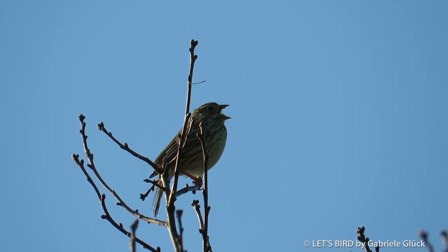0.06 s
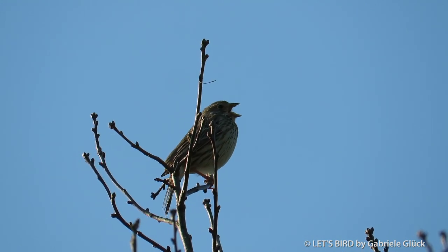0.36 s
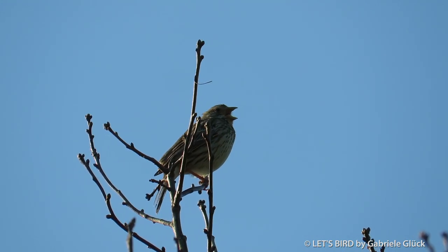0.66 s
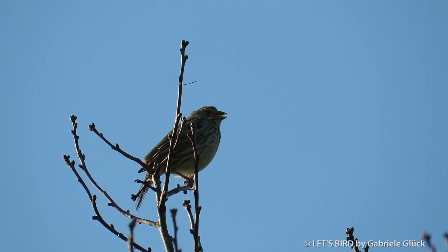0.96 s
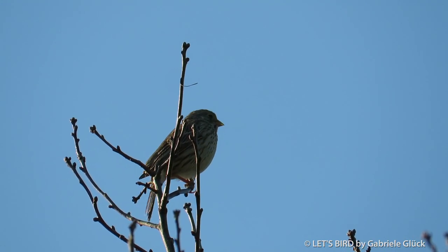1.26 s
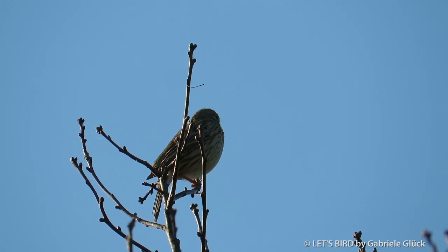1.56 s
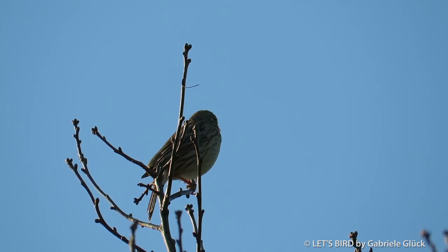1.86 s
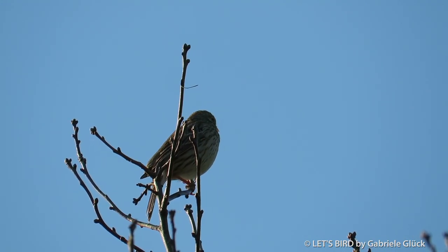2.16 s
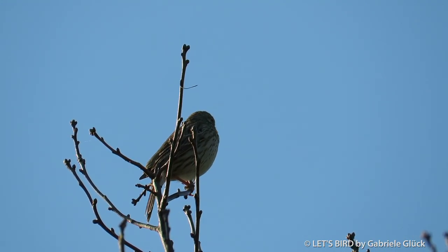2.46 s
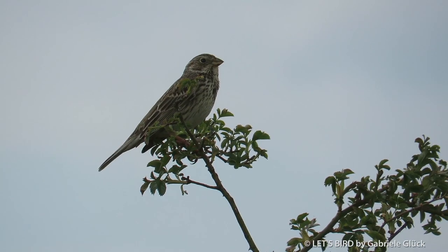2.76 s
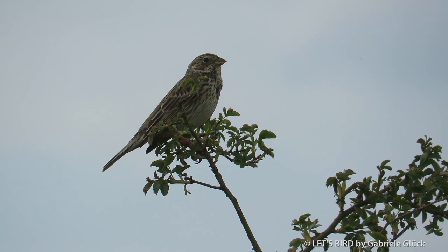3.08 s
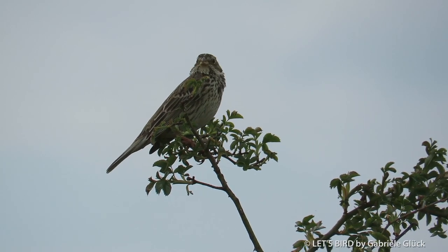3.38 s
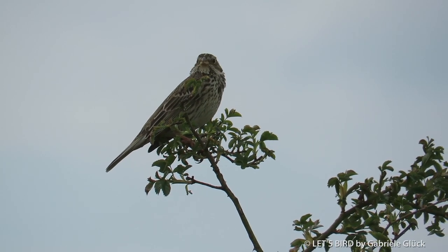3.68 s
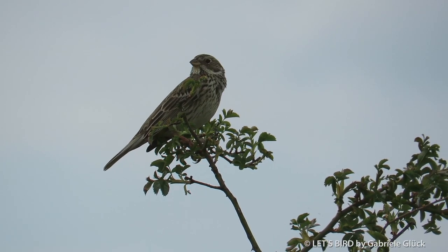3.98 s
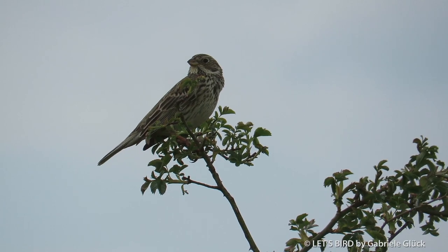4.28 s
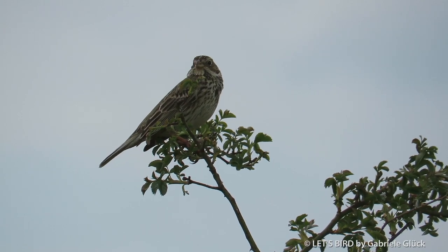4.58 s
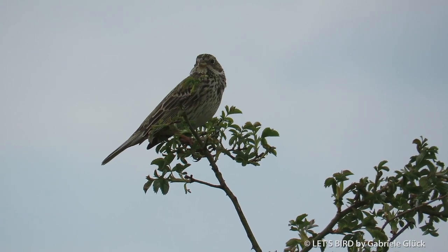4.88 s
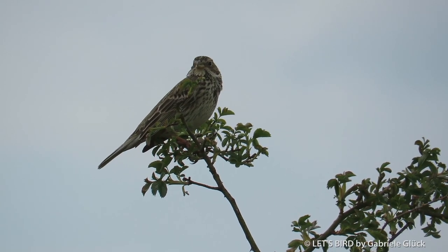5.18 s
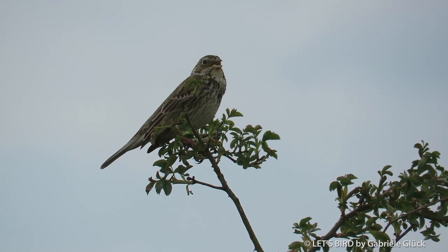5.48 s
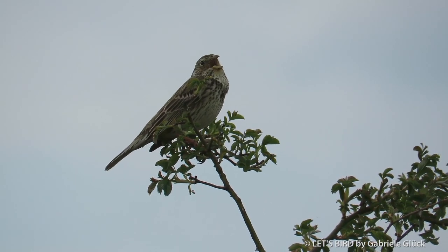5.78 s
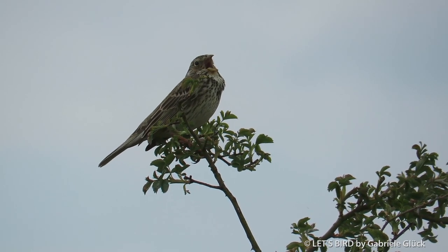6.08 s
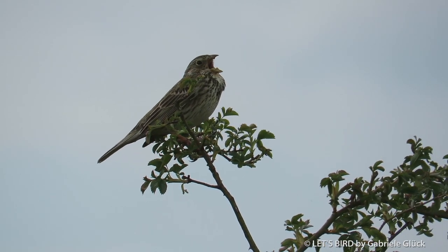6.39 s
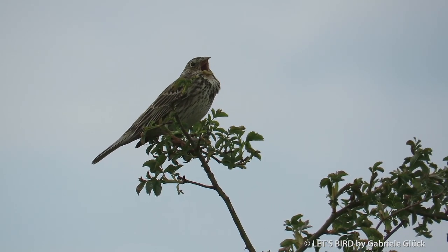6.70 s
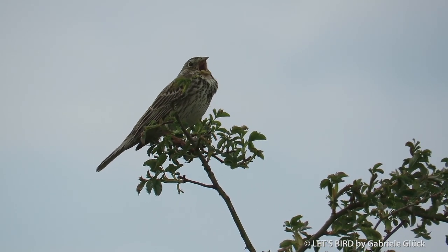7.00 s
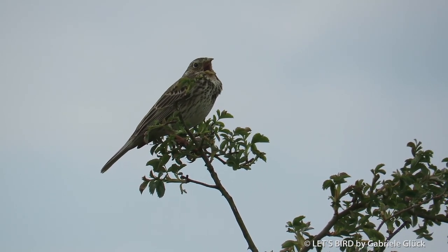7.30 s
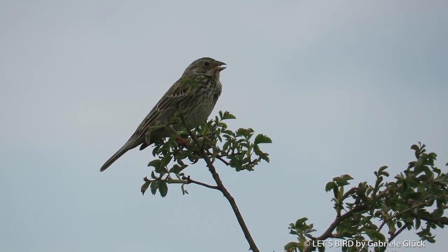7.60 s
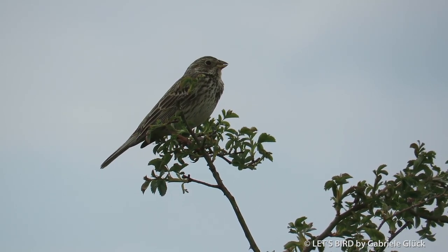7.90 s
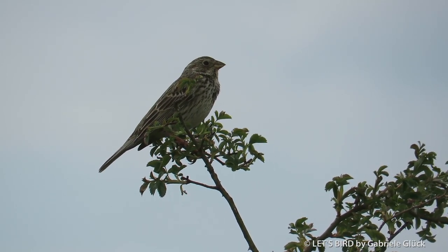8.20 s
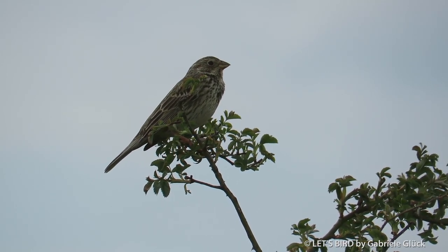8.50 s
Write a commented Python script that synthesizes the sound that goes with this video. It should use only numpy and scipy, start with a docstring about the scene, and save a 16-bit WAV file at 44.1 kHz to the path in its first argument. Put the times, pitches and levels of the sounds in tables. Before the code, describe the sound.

From the start, a small bird close by sings a fast, high jangle of chirps and buzzes, ending with four quick chinks at about 1 to 1.2 seconds. Behind it are a soft outdoor hush, faint electronic crackle and a mellow distant warble. At 2.5 seconds the background changes abruptly: the crackle and warble stop, the hush softens, and a thin, very high electronic whine begins and stays. Light puffs of wind rumble on the microphone now and then, while faraway birds whistle and trill faintly. At about 5.4 seconds the close bird starts six sharp ticks that quicken and grow louder. From 6.2 seconds they tumble into a bright, buzzy jumble, closing with a short rattle from 7.2 to 7.6 seconds. Distant birds, whine and soft wind continue until about 8.6 seconds.

```python
"""A jangle of glides, buzzes and high chinks, over faint crackle, ends one corn bunting song. After a cut
to another bush it sings a whole one: ticks, a jumble, a rattle. The two sides of its syrinx are separate
oscillators, rapidly modulated in frequency; foliage scatters their sound. Other birds sing far off in
the hush of open country. A camera's electronics crackle at the first bush; at the second they whine
very high, and wind rumbles in puffs."""
import sys
import numpy as np
from scipy import signal
from scipy.fft import rfft, irfft, next_fast_len
from scipy.io import wavfile
from scipy.ndimage import uniform_filter1d

SR = 44100
rng = np.random.default_rng(int(sys.argv[2]) if len(sys.argv) > 2 else 0)


def generate_wav(signal):
    """Clip the signal to [-1, 1] and save it as 16-bit WAV at the path in sys.argv[1]."""
    frames = np.transpose(np.atleast_2d(signal))
    scaled = np.clip(frames, -1, 1) * 32767
    pcm = np.round(scaled).astype(np.int16)
    wavfile.write(sys.argv[1], SR, pcm)


N = 381465
T = np.arange(N) / SR
CUT_S = 2.494  # from the first bush to the second


def undb(db):
    """Amplitude ratio of a level; all levels below are relative, ahead of filtering and mixing."""
    return 10 ** (np.asarray(db) / 20)


def unit(x):
    """Normalisation to rms 1."""
    return x / np.sqrt(np.mean(x ** 2))


def add(out, start_s, x):
    """Superposition: x joins out at start_s."""
    i = max(int(start_s * SR), 0)
    out[i:i + len(x)] += x[:max(N - i, 0)]


def walk(rate_hz, size=N):
    """Low-pass noise: a smooth random wander with a spread near 1."""
    k = int(SR / rate_hz)
    steps = np.repeat(rng.standard_normal(size // k + 1), k)
    return 1.73 * uniform_filter1d(uniform_filter1d(steps, k), k)[:size]


def colour(x, points):
    """Zero-phase filtering by a curve of (f/Hz, gain/dB) points."""
    hz, db = np.transpose(points)
    size = next_fast_len(N)
    f = np.maximum(np.fft.rfftfreq(size, 1 / SR), 1)
    gain = undb(np.interp(np.log(f), np.log(hz), db))
    return irfft(rfft(x, size) * gain, size)[..., :N]


def noise_pair(spectrum):
    """Spectral shaping of two uncorrelated noises."""
    return unit(colour(rng.standard_normal((2, N)), spectrum))


def mid_side(pair, width):
    """Sum and difference of two signals give left and right."""
    return pair[0] + width * pair[1] * np.array([[1], [-1]])


def progress(length):
    """Normalised time u, from 0 to 1 over a length in seconds."""
    return np.linspace(0, 1, max(int(length * SR), 16))


def arch(u, hold=2.2):
    """Pressure envelope: a saturated half sine, flatter on top with more hold."""
    return np.tanh(hold * np.abs(np.sin(np.pi * u)))


# Spectrum of the open air at each bush: f/Hz, level/dB
FIRST_AIR = [(15, -45), (25, -13), (119, -0.5), (173, -2), (349, -3.5), (509, -8), (804, -4.5), (1110, -9),
             (1750, -4), (3630, -6.5), (15500, -10)]
SECOND_AIR = [(15, -74), (25, -42), (49, -8), (180, 1.5), (415, -12.5), (538, -11), (1640, -18),
              (2770, -17.5), (5300, -20.5), (12500, -22), (16200, -54), (22000, -120)]


def air(spectrum, db, side):
    """Ambient noise, swelling a little; the curve side (f/Hz, gain/dB) decorrelates the channels."""
    mid, other = noise_pair(spectrum)
    return mid_side([mid, colour(other, side)], 1) * undb(db + .5 * walk(5.27))


# Spectrum of a distant hum: f/Hz, level/dB
DRONE_SPECTRUM = [(470, -35), (540, 0), (600, -22), (720, -20), (830, -3), (950, -9), (1200, -35)]


def drone(db=-72):
    """Narrow-band noise: two soft bands hum far away."""
    return undb(db) * mid_side(noise_pair(DRONE_SPECTRUM), .8)


# Puffs of wind: centre t/s, duration/s, level/dB
WIND_PUFFS = [(2.7, 0.57, -58.5), (2.883, 0.12, -59), (3.22, 0.15, -59), (4.204, 0.1, -62.5),
              (4.518, 0.13, -57), (4.76, 0.094, -59), (5.8, 0.11, -56.5), (6.702, 0.72, -55.5),
              (7.37, .14, -62), (7.67, 0.22, -61), (8.08, .12, -57.5)]


def gusts():
    """Flow noise: puffs of wind rumble around the camera."""
    strength = np.zeros(N)
    for centre, length, db in WIND_PUFFS:
        add(strength, centre - length / 2, undb(db) * arch(progress(length)))
    rumble = noise_pair([(40, -48), (120, -0.5), (250, -4.5), (450, -19), (1500, -49)])
    return mid_side(rumble, 0.14) * strength * undb(0.5 + 1.5 * walk(30))


def crackle(rate_hz=260, db=-52.0):
    """Impulse noise: bright electronic clicks, a Poisson process whose wandering rate forms clusters."""
    fires = rng.random(N) < rate_hz * undb(4 * walk(60)) / SR
    clicks = fires * rng.choice([-1, 1], N) * undb(4.9 * rng.standard_normal(N))
    return undb(db) * unit(colour(clicks, [(1000, -3.5), (5000, -7.5), (12000, 2), (15500, 5)]))


# Pitch of the electronic whine: t/s, f/Hz
WHINE_PITCH = [(2.5, 14589), (3.32, 14560), (8.65, 14565)]


def whine(db=-35, wander_hz=13):
    """Frequency drift: a thin, slightly unsteady pure tone from the camera."""
    hz = np.interp(T, *np.transpose(WHINE_PITCH)) + wander_hz * walk(14)
    return undb(db) * unit(np.sin(2 * np.pi * np.cumsum(hz) / SR))


def scatter(x, t60_s, build_s):
    """Multiple scattering by leaves and ground: an exponentially decaying tail for each channel."""
    t = T[:SR]
    tail = rng.standard_normal((2, SR)) * undb(-60 * t / t60_s) * (1 - np.exp(-t / build_s))
    tail /= np.sqrt(np.sum(tail ** 2, axis=1, keepdims=True))
    return signal.fftconvolve(x[None], tail, axes=1)[:, :N]


def syrinx(hz, waver=0.0083, waver_hz=900):
    """Self-sustained oscillation of one membrane: a sine with random frequency jitter."""
    unsteady_hz = hz * (1 + waver * walk(waver_hz, size=len(hz)))
    return np.sin(2 * np.pi * np.cumsum(unsteady_hz) / SR)


def glide(length, db, start_hz, mid_hz, end_hz, hold=1.7, **jitter):
    """Frequency sweep: a whistle swells and fades along a parabola through three pitches."""
    u = progress(length)
    hz = start_hz + (end_hz - start_hz) * u + 2 * (2 * mid_hz - start_hz - end_hz) * u * (1 - u)
    envelope = arch(u, hold) / np.tanh(hold)
    return undb(db) * envelope * syrinx(hz, **jitter)


def far_notes(notes, waver, waver_hz, flutter_db):
    """Amplitude modulation: distant whistles flutter at random; trills also pulse and are hoarser."""
    out = np.zeros(N)
    for start, length, db, start_hz, mid_hz, end_hz, *trill in notes:
        pulse_hz = trill[0] if trill else 0
        hoarse = 0.0364 * (pulse_hz > 10)
        note = glide(length, db, start_hz, mid_hz, end_hz, waver=waver + hoarse, waver_hz=waver_hz)
        add(out, start, note * np.cos(np.pi * pulse_hz * length * progress(length)) ** 2)
    return out * undb(flutter_db * walk(70))


def chatter(count=220, db=-70, low_hz=2600, high_hz=5000):
    """Uniform random distribution: rows of short notes for the farthest birds, after the cut."""
    rows = []
    for when, length, loud, pitch, bend in rng.random((count, 5)):
        start = CUT_S + when * (N / SR - CUT_S)
        hz = low_hz + pitch * (high_hz - low_hz)
        slope = 0.248 * (bend - .5)
        contour = hz * (1 + slope), hz, hz * (1 - slope)
        rows.append((start, 0.0194 + .05 * length, db + 6 * (loud - .5), *contour))
    return rows


# Thin whistles and trills: t/s, duration/s, level/dB, start f/Hz, middle f/Hz, end f/Hz, pulse rate/Hz
FIELD_NOTES = [(.09, .06, -49.5, 4600, 3600, 4800, 0), (.16, .055, -47.5, 4440, 4570, 4040, 0),
               (3.25, .17, -66, 2740, 2700, 2720, 0), (3.48, .09, -61, 4800, 4650, 4300, 60),
               (4.12, 0.12, -55.5, 1995, 2300, 2500, 54), (4.38, 0.092, -56.5, 5450, 4260, 3580, 66),
               (4.49, 0.27, -54.5, 3140, 3100, 3140, 139.5), (4.88, 0.061, -54, 5400, 4700, 4380, -2),
               (4.99, 0.23, -55.5, 5290, 5330, 5330, 0), (5.28, 0.26, -54.5, 3520, 3620, 3240, 28.5),
               (5.78, .11, -60, 3500, 3250, 3350, 45), (5.98, .14, -61, 3620, 3170, 2740, 49),
               (7.25, 0.135, -55, 3900, 2960, 2260, 50), (7.6, .12, -56.5, 3620, 3090, 2700, 2),
               (7.93, 0.088, -57, 3200, 3500, 3670, 71), (8.06, 0.085, -59, 4940, 4760, 4950, 52),
               (8.3, 0.15, -55, 4800, 3980, 4100, 68)]


def field_birds():
    """Direct and diffuse sound: from far birds the scattered part is almost as strong as the direct."""
    direct = far_notes(FIELD_NOTES + chatter(), waver=0.0036, waver_hz=360, flutter_db=2.5)
    return undb(1.5) * direct + undb(-2.5) * scatter(direct, t60_s=0.56, build_s=0.0079)


# Mellow phrases: t/s, duration/s, level/dB, start f/Hz, middle f/Hz, end f/Hz
WARBLE_NOTES = [(0, .25, -55.5, 1800, 2000, 1810), (.3, .42, -55, 1945, 1600, 1513),
                (1, .15, -52.5, 1800, 2030, 1830), (1.12, 0.21, -53.5, 1650, 1960, 1620),
                (1.38, .26, -54.5, 1950, 1713, 1600), (1.75, 0.29, -53, 1550, 1960, 1450),
                (1.92, 0.18, -59.5, 2100, 2257, 2427), (2.23, 0.24, -63, 1300, 1296, 1257),
                (2.26, 0.21, -61, 1750, 1870, 1610)]


def far_songbird():
    """Frequency jitter makes a low, distant warble quaver; scattering blurs it."""
    direct = far_notes(WARBLE_NOTES, waver=0.021, waver_hz=230, flutter_db=2.0)
    return direct + undb(-2.5) * mid_side(scatter(direct, t60_s=0.24, build_s=0.0047), 0.12)


# Opening ticks: t/s, level/dB, frequency ratio
OPENING_TICKS = [(5.366, -28.5, 0.96), (5.582, -17.5, 0.98), (5.761, -14.5, .98), (5.921, -13, 0.99),
                 (6.054, -12.5, 1.008), (6.178, -12, 1.015)]
# Glides within a tick: delay/s, duration/s, level/dB, start f/Hz, middle f/Hz, end f/Hz
TICK_GLIDES = [(0, 0.0086, -2.5, 5910, 4920, 4300), (.007, 0.0051, -5, 4220, 4500, 5000),
               (0.015, 0.00136, -9.5, 4420, 4800, 5300), (.018, 0.0032, -4, 4500, 4660, 5630),
               (.022, .007, -2.5, 4600, 4750, 4400), (0.023, 0.0048, -2, 5600, 5680, 5730)]


def ticks():
    """Temporal fusion: a quick cluster of glides is heard as one tick."""
    out = np.zeros(N)
    for start, db, ratio in OPENING_TICKS:
        for delay, length, part_db, *pitch in TICK_GLIDES:
            add(out, start + delay, glide(length, db + part_db, *ratio * np.array(pitch)))
    return out


def syllable(length, shape, db, ratio):
    """Time scaling and transposition of a shape, which holds one glide per sounding syrinx side."""
    out = np.zeros(int(1.3 * length * SR) + 16)
    for onset, share, side_db, *pitch in shape:
        add(out, onset * length, glide(share * length, db + side_db, *ratio * np.array(pitch)))
    return out


def runs(shape, rows, swell_db=0, sag=0):
    """Periodic repetition: each note gains swell_db and sinks in pitch by the fraction sag."""
    out = np.zeros(N)
    for start, length, db, ratio, notes, period in rows:
        for k in range(round(notes)):
            add(out, start + k * period, syllable(length, shape, db + k * swell_db, ratio * (1 - k * sag)))
    return out


# Syllable shapes: onset and duration as fractions, level/dB, start f/Hz, middle f/Hz, end f/Hz
DOWNSWEEP = [(0, 1, 0, 7450, 6350, 4700)]
UPSWEEP = [(0, 0.98, 0, 4540, 6560, 7200)]
HOOK = [(0, 1, 0, 7000, 5350, 5150)]  # drops, then levels out
LOW_ARCH = [(0.00048, 0.97, 0, 4750, 5780, 4700)]
SCOOP = [(0.0028, 1, 0, 5100, 4700, 6750)]  # dips, then rises
LOW_NOTE = [(0.00045, 0.99, 0, 5200, 5380, 5500)]
HIGH_CHIP = [(0, 1, 0, 7000, 7400, 7610)]
SLUR = [(0, 1, 0, 5950, 6520, 5950)]
# Runs of each shape: t/s, note duration/s, level/dB, frequency ratio, note count, period/s
DOWNSWEEP_RUNS = [(.684, .014, -20, 1.05, 3, .0198), (.778, .017, -18, .98, 3, .0302),
                  (.9303, .0172, -20.5, .98, 1, 0), (6.3416, .0095, -15.5, 0.98, 2, .0138),
                  (6.852, .0087, -13.5, 1.02, 1, 0)]
UPSWEEP_RUNS = [(.235, .0035, -20, 1.03, 1, 0), (.4715, .004, -31, .8, 1, 0),
                (.486, .0035, -26, 0.84, 1, 0), (.666, 0.0067, -22, 0.99, 1, 0),
                (.876, .016, -17.5, 1.004, 1, 0), (.9106, .014, -22, 1.02, 1, 0),
                (6.9075, 0.0044, -13.5, .99, 4, .0145), (7.2175, .004, -25, .85, 1, 0)]
HOOK_RUNS = [(0.0183, 0.0048, -18.5, 0.99, 2, .023), (0.168, 0.0082, -23.5, 1.14, 1, 0),
             (6.546, 0.0052, -19, 1.04, 1, 0), (6.597, .0053, -13, 0.99, 1, 0),
             (6.6342, 0.0068, -17.5, 1.01, 1, 0), (6.7468, .0068, -17, 1.04, 1, 0),
             (6.9586, .0096, -14.5, 1.038, 1, 0), (7.039, .0055, -16.5, 0.98, 2, .018),
             (7.219, .013, -16, 0.98, 1, 0)]
LOW_ARCH_RUNS = [(.3383, 0.013, -19.5, 1, 3, .0127), (.4263, .015, -21, .97, 1, 0),
                 (0.7423, .012, -21, 1.08, 2, 0.013), (6.902, .005, -22, .82, 1, 0),
                 (6.917, .0075, -15.5, .93, 3, .0142), (7.076, 0.0069, -17, 0.94, 1, 0)]
SCOOP_RUNS = [(7.018, 0.0099, -26.5, .98, 3, .017), (7.1932, .0098, -17, 1.133, 1, 0)]
LOW_NOTE_RUNS = [(0.057, .005, -22, .96, 4, .0131), (.1508, .009, -16, 1.014, 1, 0),
                 (.1684, .0115, -18, .99, 2, .0128), (.2834, .014, -16, 1, 1, 0),
                 (0.302, .0094, -18.5, 1.01, 1, 0), (0.377, .011, -19, 1.01, 1, 0),
                 (6.669, .003, -24, .95, 4, .004)]
HIGH_CHIP_RUNS = [(.052, .0085, -24, .92, 5, .0126), (.196, .011, -23.5, 0.99, 1, 0),
                  (.3172, .0063, -27, 1, 1, 0), (.4278, .0097, -26.5, 1.01, 1, 0),
                  (.471, .009, -28, 1, 1, 0), (.4865, .0078, -24, 1, 1, 0),
                  (.5688, 0.009, -23.7, 1, 7, .0131), (6.666, .0042, -16.5, 1, 1, 0),
                  (6.8467, 0.014, -18, 1, 1, 0), (6.866, .0081, -15, 1.003, 1, 0),
                  (7.024, .006, -14.5, .97, 3, .0193)]
SLUR_RUNS = [(6.683, .034, -13.5, 1, 1, 0)]


def one_voice_jumble():
    """Unilateral phonation: each jangling syllable is a fast sweep from one side of the syrinx."""
    return (runs(DOWNSWEEP, DOWNSWEEP_RUNS, swell_db=0.5)
            + runs(UPSWEEP, UPSWEEP_RUNS, swell_db=-1.2)
            + runs(HOOK, HOOK_RUNS)
            + runs(LOW_ARCH, LOW_ARCH_RUNS, swell_db=1.2, sag=0.0082)
            + runs(SCOOP, SCOOP_RUNS, swell_db=1.5)
            + runs(LOW_NOTE, LOW_NOTE_RUNS)
            + runs(HIGH_CHIP, HIGH_CHIP_RUNS)
            + runs(SLUR, SLUR_RUNS))


# Shapes, a row per side: onset and duration as fractions, level/dB, start f/Hz, middle f/Hz, end f/Hz
PIP = [(0, 1, 0.27, 6650, 7150, 7650), (0, 1, -2, 5120, 5180, 4950)]
CLINK = [(0, 1, 0, 7760, 6860, 7320), (0, .65, -5, 5600, 5400, 4850)]
TWIN_RISE = [(0, 0.67, -2, 6850, 7370, 6950), (.04, 1, 0, 5050, 5430, 6400)]
TWIN_FALL = [(0, 1, 0, 7270, 7230, 5600), (.3, .65, -4, 6370, 5620, 5900)]
# Runs of each shape: t/s, note duration/s, level/dB, frequency ratio, note count, period/s
PIP_RUNS = [(0.115, 0.0044, -27, .98, 5, 0.0063), (.245, .0074, -24, 1, 1, 0),
            (6.4183, .004, -21.5, 0.99, 2, 0.012), (6.446, .004, -22, 0.99, 4, .0117),
            (6.4903, 0.0022, -28, 1, 2, .004), (6.499, .004, -18.5, 1, 2, 0.021),
            (6.511, .0025, -29, 1, 2, .0055), (6.558, .0052, -18, 1, 2, .0122),
            (6.612, .005, -18, 0.99, 2, 0.0108), (6.723, .0065, -18, 1, 2, 0.013),
            (6.7595, .0061, -19.5, 1, 1, 0), (6.771, 0.0032, -26, 1, 5, 0.0045)]
CLINK_RUNS = [(6.2396, .0054, -15, 1, 2, .0413), (6.329, .0069, -19, 0.99, 1, 0)]
TWIN_RISE_RUNS = [(6.7936, 0.008, -16, 1, 5, .0095)]
TWIN_FALL_RUNS = [(7.0894, .013, -15.5, 1.011, 4, .0157)]


def two_voice_jumble():
    """Biphonation: both sides of the syrinx sound at once, at unrelated frequencies."""
    return (runs(PIP, PIP_RUNS, swell_db=0.9)
            + runs(CLINK, CLINK_RUNS)
            + runs(TWIN_RISE, TWIN_RISE_RUNS, swell_db=.8)
            + runs(TWIN_FALL, TWIN_FALL_RUNS, swell_db=0.36, sag=.025))


# Buzzes: t/s, duration/s, level/dB, carrier f/Hz, deviation/Hz, modulation f/Hz
BUZZ_NOTES = [(0.0035, 0.0179, -31, 6200, 1030, 366), (.03, .013, -27, 6500, 800, 364),
              (0.211, 0.0246, -28.5, 7150, 500, 350), (0.255, 0.035, -20, 5450, 210, 214),
              (0.3277, 0.0218, -20.5, 7180, 210, 390), (0.378, 0.048, -16, 5430, 140, 327),
              (0.506, 0.049, -19, 7100, 308, 397), (6.3806, 0.034, -14, 5560, 604, 424),
              (6.537, 0.0132, -16.5, 7070, 430, 500), (6.5795, 0.018, -20, 5380, 560, 352),
              (6.6477, 0.017, -15.5, 7150, 262, 450), (6.65, 0.015, -15, 5420, 408, 450),
              (6.8778, 0.017, -10.5, 5790, 260, 525), (6.9868, 0.025, -10, 6040, 425, 495)]


def buzzes(throb=.33, rise_hz=80, swell_power=.6):
    """Frequency modulation: very fast vibrato gives swelling notes sidebands; airflow pulses in step."""
    out = np.zeros(N)
    for start, length, db, hz, swing_hz, vibrato_hz in BUZZ_NOTES:
        u = progress(length)
        phase = 2 * np.pi * vibrato_hz * length * u
        tone = syrinx(hz + rise_hz * (u - .5) + swing_hz * np.sin(phase))
        envelope = arch(u) * u ** swell_power * (1 + throb * np.cos(phase))
        add(out, start, undb(db) * envelope * tone)
    return out


def closing_series(first_s, last_s, length, db, count, slowing=.12, fade_db=12, fade_notes=1.08):
    """Deceleration and decay: notes (t/s, duration/s, level/dB) spread out and the last ones fade."""
    u = np.linspace(0, 1, count)
    times = first_s + (last_s - first_s) * (u - slowing * u * (1 - u))
    levels = db - fade_db * np.exp(-np.arange(count)[::-1] / fade_notes)
    return [(start, length, note_db) for start, note_db in zip(times, levels)]


# Close of the first song: first t/s, last t/s, note duration/s, level/dB
CHINK_SERIES = (.9848, 1.1516, .0145, -20.8)
# One chink: onset and duration as fractions, level/dB, start f/Hz, middle f/Hz, end f/Hz
CHINK = [(0, 0.95, 0, 8100, 7200, 7600)]


def chinks():
    """Tone bursts: high notes that each dip in frequency and partly recover."""
    out = np.zeros(N)
    for start, length, db in closing_series(*CHINK_SERIES, count=4):
        add(out, start, syllable(length, CHINK, db, 1))
    return out


# Close of the second song: first t/s, last t/s, note duration/s, level/dB
RATTLE_SERIES = (7.248, 7.557, 0.0339, -16.6)
# Contour of one rattle note: fraction of its duration, f/Hz, level/dB
RATTLE_CONTOUR = [(0, 8000, -29), (.13, 7440, -0.5), (.3, 7070, 1), (.6, 6620, -3), (.8, 6250, -4.5),
                  (.92, 5530, -6.5), (1, 4800, -28)]


def rattle():
    """A chirp train: falling sweeps in quick succession are heard as a rattle."""
    out = np.zeros(N)
    share, contour_hz, contour_db = np.transpose(RATTLE_CONTOUR)
    for start, length, db in closing_series(*RATTLE_SERIES, count=8):
        u = progress(length)
        envelope = undb(db + np.interp(u, share, contour_db))
        add(out, start, envelope * syrinx(np.interp(u, share, contour_hz)))
    return out


def bunting(overtone_db=-25):
    """Source and filter: the throat weakens the lows; nonlinear airflow adds octaves and sum tones."""
    source = ticks() + one_voice_jumble() + two_voice_jumble() + buzzes() + chinks() + rattle()
    voice = colour(source, [(3300, -8.5), (4400, 0), (7900, -1), (9200, 4)])
    overtones = colour(np.abs(voice), [(5000, -74), (8500, 2.5), (13000, 2), (16000, 2)])
    return voice + undb(overtone_db) * overtones


def scene():
    """Superposition: the bunting in each bush's own surroundings, with field birds across the cut."""
    song = undb(-0.4) * bunting()
    distant = field_birds()

    first = song + undb(-12.5) * mid_side(scatter(song, t60_s=0.082, build_s=0.0011), 0.024)
    first += far_songbird()
    hush = air(FIRST_AIR, -50.5, side=[(60, -18), (300, -1.5), (1000, -4), (12000, 0.5)])
    first += colour(hush, [(1100, 3), (1800, 0), (3000, -6), (10000, -4)]) + crackle()

    second = song + undb(-18) * mid_side(scatter(song, t60_s=.15, build_s=0.0011), 0.036)
    hush = air(SECOND_AIR, -55, side=[(60, -26), (200, -2.5), (500, 2), (12000, -0.5)])
    second += colour(hush, [(60, -1.5), (160, -6.5), (500, 0.5)]) + gusts() + drone() + whine()

    crossfade = np.clip((T - CUT_S) / 0.0028, 0, 1)
    return (1 - crossfade) * first + crossfade * second + distant


def record(dry):
    """Band limiting: a steep low-pass removes the top; the left channel is a touch louder."""
    lowpass = signal.ellip(10, .1, 80, 15900, fs=SR, output="sos")
    return signal.sosfilt(lowpass, dry * undb([[.2], [-.2]]))


dry = scene()
out = record(dry)
generate_wav(out)
```